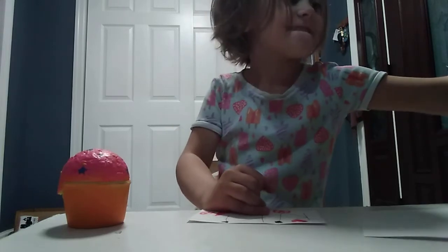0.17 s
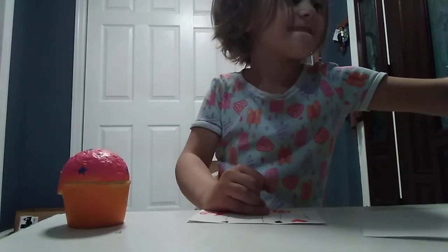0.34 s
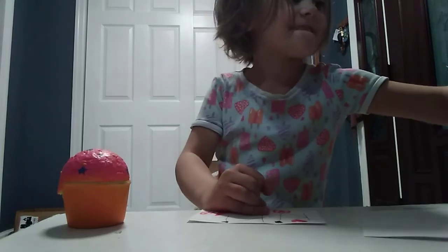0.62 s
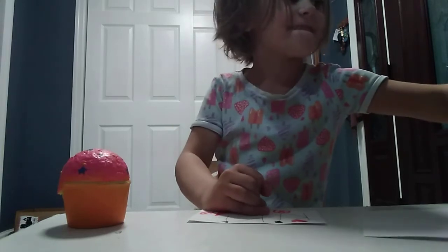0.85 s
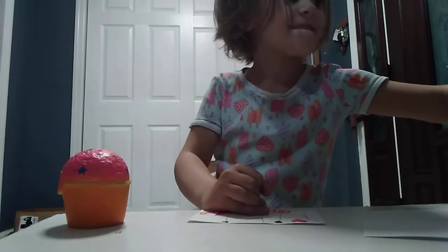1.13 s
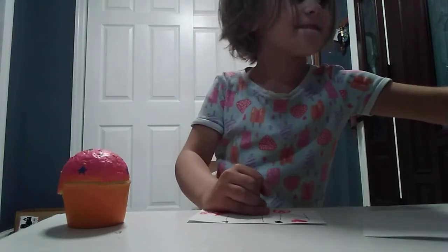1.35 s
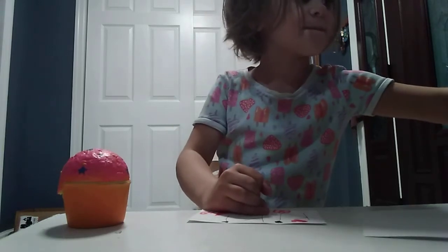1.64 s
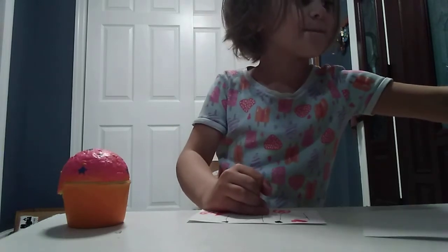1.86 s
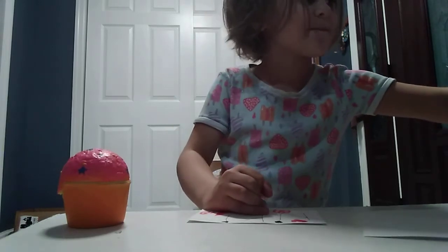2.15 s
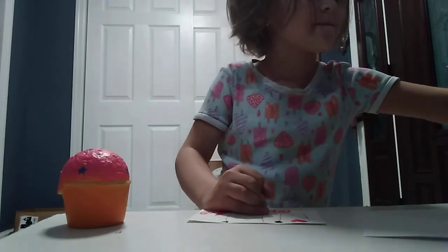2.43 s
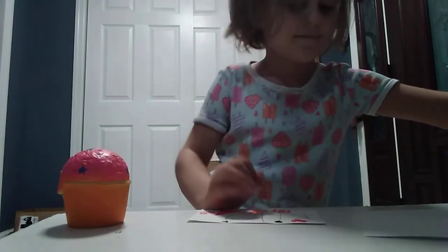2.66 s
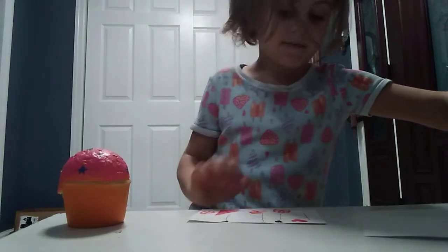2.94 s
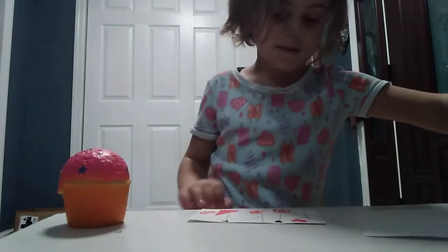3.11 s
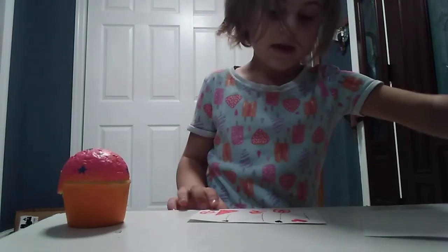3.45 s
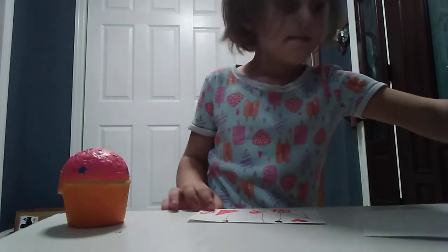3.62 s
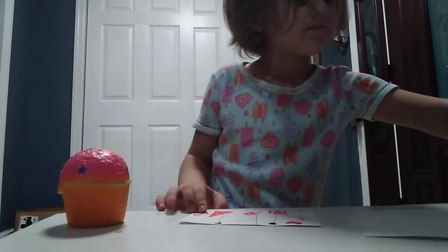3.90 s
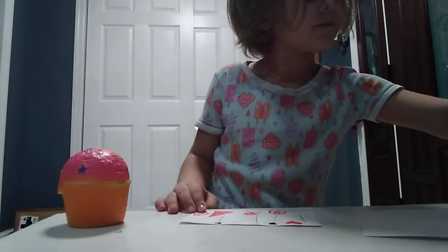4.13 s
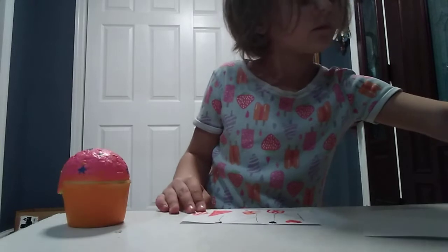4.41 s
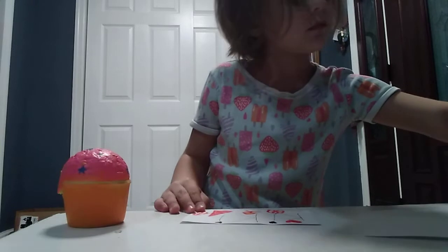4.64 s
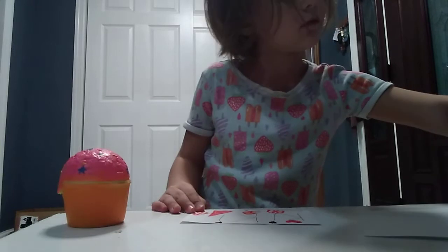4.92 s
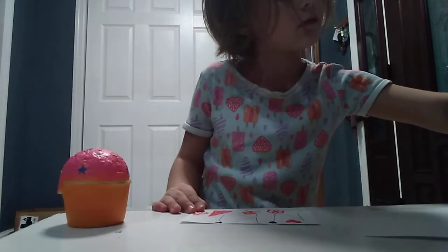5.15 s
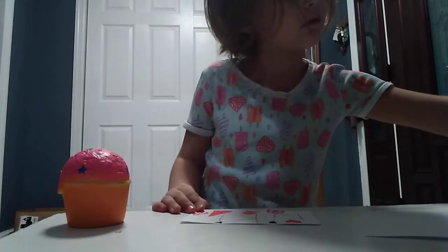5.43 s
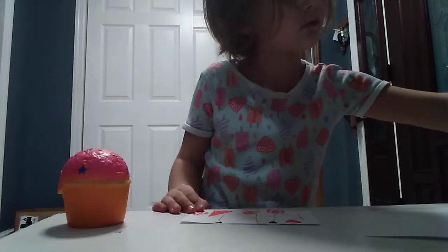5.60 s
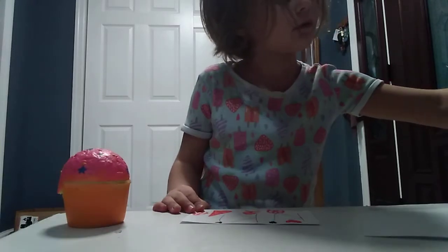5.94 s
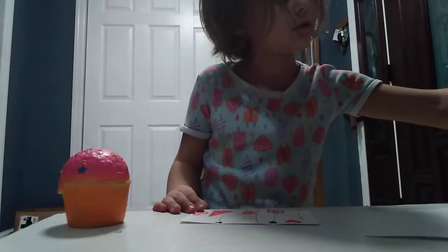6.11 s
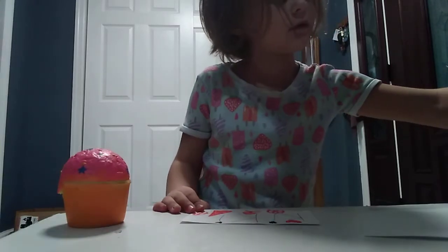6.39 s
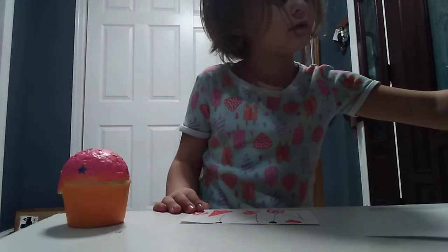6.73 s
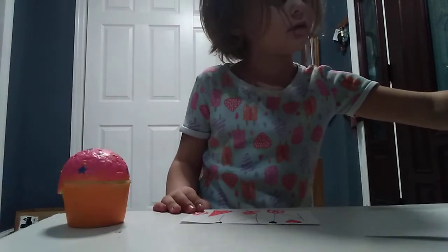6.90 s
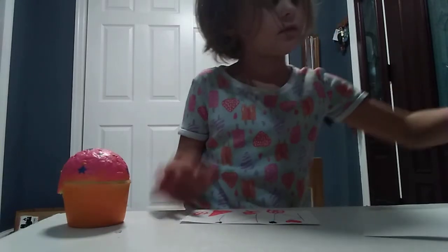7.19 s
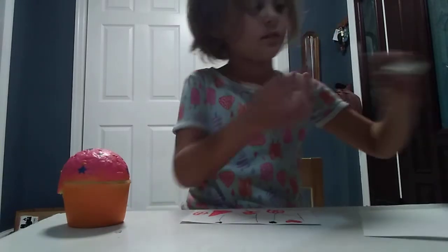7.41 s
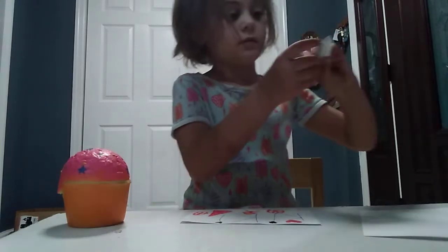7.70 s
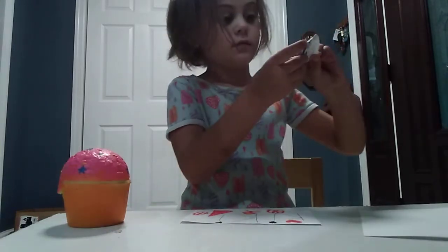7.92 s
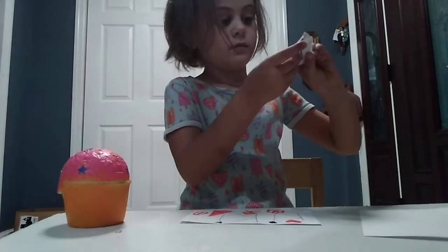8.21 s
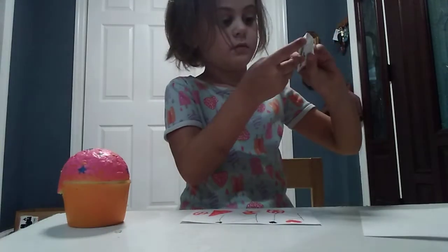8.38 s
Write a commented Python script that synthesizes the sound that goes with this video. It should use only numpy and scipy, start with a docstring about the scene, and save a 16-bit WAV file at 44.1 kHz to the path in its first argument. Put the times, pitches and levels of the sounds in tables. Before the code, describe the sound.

Close, dry stereo sound of a hand handling paper cards on a table in a small room, brighter on the left. From 0 to 0.5 s card edges tick and slide, with a sharp snap near 0.2; softer rubbing follows. From 1 to 2.2 s snaps come densely, strongest around 1.9 to 2.0. Then it thins: faint rustles and light flicks until 3.4, a tiny high squeak at 3.45, small knocks at 3.7 and a duller push at 3.9. A crisp click stands out at 4.5. Short scrapes continue, with a palm wipe at 5.7. A flurry of snaps at 6.2 to 6.4 leads into a loud, hollow, booming double knock at 6.44, then wiping. Near quiet around 7 s, with soft, dull ticks. Knocks and low bumps cluster at 7.5 to 7.65, then sparse faint sounds, ending with a thump and snap at 8.45.

```python
"""Card edges snap and tick, paper slides and rustles, and now and then a table top is knocked and booms.
A hand rummages through paper cards on a table, close to the left port of a small stereo recorder indoors.
Snaps are short noise bursts and slides are grainy friction noise, both shaped by resonances of the cards;
knocks and strokes drive the modes of the table. The ports hear the bass in roughly opposite phase,
and the right one is shaded from the treble."""
import sys
import numpy as np
from scipy import signal
from scipy.fft import rfft, irfft, next_fast_len
from scipy.io import wavfile
from scipy.ndimage import uniform_filter1d, map_coordinates

SR = 44100
rng = np.random.default_rng(int(sys.argv[2]) if len(sys.argv) > 2 else 0)


def output_pcm(signal):
    """Save a mono or channel-first signal as 16-bit PCM at the path in sys.argv[1].

    Samples are clipped to [-1, 1] before scaling.
    """
    pcm = np.clip(np.atleast_2d(signal).T, -1, 1) * 32767
    wavfile.write(sys.argv[1], SR, np.round(pcm).astype(np.int16))


N = 377055


def amp(db):
    """Decibel law: the amplitude ratio of a level in dB."""
    return 10 ** (np.asarray(db) / 20)


def unit(x):
    """Power normalisation: x brought to rms 1."""
    return x / np.sqrt(np.mean(np.abs(x) ** 2) + 1e-20)


def curves(rows):
    """Linear interpolation: one value per sample for each column after the time."""
    seconds, *columns = np.transpose(rows)
    return [np.interp(np.arange(N) / SR, seconds, column) for column in columns]


def wobble(rate):
    """Band-limited fluctuation: a smooth random curve with rate knots a second."""
    knots = rng.standard_normal(int(N * rate / SR) + 4)
    return map_coordinates(knots, [np.arange(N) * rate / SR])


def along(hz, values, f):
    """Logarithmic frequency scale: values given at hz, read at f."""
    return np.interp(np.log(f + 1), np.log(hz), values)


def filtered(x, response):
    """Linear filtering: the spectrum of x times a complex response of frequency."""
    m = next_fast_len(N + SR // 2)
    return irfft(rfft(x, m) * response(np.fft.rfftfreq(m, 1 / SR)), m)[..., :N]


def ringing(x, modes, order):
    """Modal superposition: resonances of alternating sign that keep the power of white noise."""
    def response(f):
        total = 0
        for k, (centre, width, db) in enumerate(modes):
            resonator = 1j * f * width / (centre * centre - f * f + 1j * f * width)
            total = total + (-1) ** k * amp(db) * resonator ** order
        return unit(total)
    return filtered(x, response)


def spikes(times, db):
    """Impulsive excitation: single samples of the given levels at the given times."""
    return np.bincount(np.round(np.asarray(times) * SR).astype(int), amp(db), N)[:N]


def dying(pulses, t60, rise):
    """Reverberant decay: two unrelated noises whose power swells after every pulse and dies away."""
    t = np.arange(SR // 2) / SR
    decay = amp(-120 * t / t60) * (1 - np.exp(-t / rise)) ** 2  # in power, 60 dB down at t60
    power = signal.fftconvolve(pulses ** 2, decay)[:N]
    return np.sqrt(np.abs(power)) * rng.standard_normal((2, N))


def friction(db, grain_db, lump_db):
    """Dry friction: fibres catch in tiny grains that clump under an uneven stroke."""
    texture = amp(grain_db * wobble(700) + lump_db * wobble(45))
    # about 70 times a second a fibre lets go with a tick
    catches = (rng.random(N) < 70 / SR) * rng.exponential(1, N)
    tick = np.exp(-np.arange(SR // 200) / 35)
    texture = texture * (1 + 0.84 * np.convolve(catches, tick)[:N])
    return amp(db) * unit(texture * rng.standard_normal((2, N)))


def patchy(x, depth_db, bins, frames):
    """Spectral fluctuation: a random gain field shifts the colour from moment to moment."""
    z = signal.stft(x, nperseg=256)[2]
    field = rng.standard_normal(z.shape[1:])
    field = uniform_filter1d(uniform_filter1d(field, bins, 0), frames, 1)
    gain = amp(depth_db * unit(field))
    return signal.istft(z * unit(gain), nperseg=256)[1][:, :N]


RISE_DB_PER_S, FALL_DB_PER_S = 162, 131.5  # how a movement swells and fades


def movement_db(starts, holds, db):
    """Energy addition: level in dB of overlapping movements that swell, hold and fade."""
    t = np.arange(0, N + 64, 64) / SR  # one value every 64 samples
    early, late = starts[:, None] - t, t - (starts + holds)[:, None]
    shape_db = -RISE_DB_PER_S * np.maximum(early, 0) - FALL_DB_PER_S * np.maximum(late, 0)
    power = np.sum(amp(db[:, None] + shape_db) ** 2, axis=0)
    return np.interp(np.arange(N) / SR, t, 10 * np.log10(power + 1e-12))


# Strokes of the hand through the cards. Each row: start in seconds, time held in seconds, relative level in dB,
# then in dB over that level: edge hiss, drag of the heap, groan of the top, rumble of the frame.
STROKES = [(0, 0.057, -45.5, 1, -2, -7, -15), (.24, 0.075, -53, 1, 0, -3.5, -25),
           (.55, 0.49, -60.5, -1, 1.5, -11, -23.5), (1.169, 0.066, -46.5, -5, -1, -10, -14),
           (1.3, 0.069, -50.5, 1, -1.5, -13.5, -13), (1.64, 0.04, -62, 10, -3, 1.5, -10),
           (1.78, 0.076, -49, 1.5, -3.5, -6.5, -30), (1.99, 0.22, -53.5, -1.5, -1.5, -2, -10.5),
           (2.26, .04, -61.5, -7, -4, -10, -13.5), (2.58, 0.14, -67.5, 5.5, 0.5, 4, -7),
           (2.798, 0.13, -50.5, -3, -4.5, -5.5, -12), (2.93, 0.21, -54.5, 3.5, -2.5, -4, -19),
           (3.33, 0.064, -56, -3, -4.5, -18, -26), (3.55, 0.23, -52, 5, -1.5, -5, -41),
           (3.838, 0.082, -50.5, 2.5, -6, -6, -7.5), (3.998, 0.05, -48, 2.5, -0.5, -0.5, -28),
           (4.13, 0.19, -56, 4, -1.5, 2, -32), (4.5, .03, -53.5, 7, -3.5, -12, -17.5),
           (4.742, 0.15, -58, 0.5, 2, -10, -28), (4.88, 0.11, -52.5, 0.5, -3, -1, -18),
           (5.07, 0.041, -65, 9, -9, -2, 6), (5.22, 0.1, -55.5, 3.5, -3.5, -17.5, -21),
           (5.392, 0.098, -49, -2, 0, -26, -38), (5.562, 0.024, -59, 8.5, 2, 1, 1),
           (5.69, 0.097, -48, 1, 0.5, 4.5, -23), (5.92, 0.046, -59.5, 2, -1.5, -3, -20),
           (6.36, 0.23, -55, 3, 0.5, 6, 1), (6.72, .025, -59.5, 19, -2, 5, 9),
           (6.745, 0.036, -50.5, 1.5, -1, 2.5, -3), (6.9, 0.062, -71.5, -8, 6, 12, 5.5),
           (7.14, 0.031, -65.5, 1.5, -15, -11.5, -26), (7.291, 0.033, -76.5, 3, -2, 2, 8.5),
           (7.411, 0.092, -62.5, 4.5, 3, 13, 8), (7.579, 0.064, -49, 3.5, -3, -3, 2.5),
           (7.782, 0.049, -61, 11, -2, -3, 0.5), (7.929, 0.017, -61, 11.5, -28, -16, -28.5),
           (8.091, 0.065, -89.5, 3, 4, 0.5, 22.5), (8.182, 0.082, -75, 21, -10, 0.5, 6.5),
           (8.27, 0.02, -75.5, 24, -9, 17, -5), (8.46, 0.048, -53.5, 2.5, 2.5, 0, -32)]
HISS, DRAG, GROAN, RUMBLE = 3, 4, 5, 6  # columns of the table


def stroke_db(layer=None):
    """Common excitation: one set of strokes sets the level of every layer, each with its own offset."""
    columns = np.transpose(STROKES)
    starts, holds, db = columns[:3]
    return movement_db(starts, holds, db if layer is None else db + columns[layer])


# Resonances of table legs and frame. Each row: centre in Hz, width of one resonator stage in Hz, relative level in dB.
FRAME = [(79, 104, 3), (155.5, 34, -4), (216, 293, -4.5)]


def frame_rumble():
    """Structure-borne sound: the strokes shake the legs and frame at their low resonances."""
    shaking = friction(stroke_db(RUMBLE) + 18, grain_db=3.0, lump_db=3.0)
    return ringing(shaking, FRAME, order=2)


# Knocks on the table top. Each row: time in seconds, relative level in dB, boom in dB over that level,
# pitch of the blow in Hz, contact (rise) time in seconds, t60 in seconds.
KNOCKS = [(2.489, -49.5, -42, 760, 0.004, 0.45), (3.453, -43.5, -46, 715, 0.0026, 0.31),
          (3.678, -33.5, -14, 940, 0.0025, 0.14), (3.94, -23, -42, 475, 0.013, 0.17),
          (4.277, -48.5, 2, 890, 0.0024, 0.14), (4.889, -39, -6, 155, 0.0048, 0.72),
          (5.551, -36, -30, 590, 0.004, 0.64), (6.049, -46, -44, 255, 0.0043, 0.42),
          (6.437, -17, -1, 441, 0.0022, 0.29), (6.459, -16.5, -17, 405, 0.003, 0.37),
          (7.27, -46.5, -24, 389, 0.0029, 0.72), (7.531, -19.5, -32, 638, 0.0029, 0.37),
          (7.595, -27, 4, 433, 0.0086, 0.19), (7.648, -31, 3, 399, 0.0062, 0.33),
          (8.079, -51, -16, 304, 0.0052, 0.53), (8.258, -45.5, -30, 517, 0.006, 0.51),
          (8.4, -44.5, -32, 454, 0.005, 0.23), (8.454, -23, -14.5, 220, 0.0076, 0.38)]
# Resonances of the table top. Each row: centre in Hz, width in Hz, relative level in dB.
TOP = [(142, 38, -7.5), (230.3, 31, -2), (309, 92, -3.5), (416, 60, -0.5), (573, 37, -3), (733, 80, -6.5),
       (1080, 390, -8), (1237, 437, -9), (2370, 930, -18.5), (9800, 8400, -31)]
# The lowest table mode: frequency in Hz, swell time in seconds.
BOOM = (76, 0.024)


def table_top():
    """Forced vibration: a blow, a rough push and a dragged arm drive the modes; the lowest swings freely."""
    push, boom = np.zeros((2, N + SR)), np.zeros((2, N + SR))
    t = np.arange(SR // 2) / SR
    boom_hz, swell = BOOM
    swing = np.sin(2 * np.pi * boom_hz * t) * t / swell * np.exp(1 - t / swell)
    for s, db, boom_db, hz, contact, t60 in KNOCKS:
        start = round(s * SR)
        force = (1 - np.exp(-t / contact)) * amp(-60 * t / t60) * rng.standard_normal((2, len(t)))
        u = t * hz * 6
        blow = 1.8 * u * np.exp(1 - u) * .003 / contact  # a shorter contact hits harder
        # the spot struck favours the modes near its pitch
        favoured = signal.lfilter(*signal.iirpeak(hz, 1.3, SR), force + blow)
        push[:, start:][:, :len(t)] += amp(db + 4) * (favoured + 0.4 * force)
        boom[0, start:][:len(t)] += amp(db + boom_db + 6) * swing
    groan = friction(stroke_db(GROAN) + 7.0, grain_db=-1.9, lump_db=0.6)  # an arm dragged over the top
    return ringing(push[:, :N] + groan, TOP, order=1) + boom[:, :N]


# A card squeaks as it slips. Each row: time in seconds, pitch in Hz, relative level in dB.
SQUEAK = [(3.426, 7120, -80), (3.432, 7280, -49), (3.446, 6960, -42), (3.455, 7260, -53), (3.47, 7430, -46),
          (3.484, 7080, -53), (3.498, 6600, -46), (3.503, 6500, -85)]


def squeak():
    """Stick-slip oscillation: a thin whistle that wavers in pitch and level."""
    hz, db = curves(SQUEAK)
    phase = 2 * np.pi * np.cumsum(hz + 60 * wobble(300)) / SR
    return amp(db - 2.5 + 3.5 * wobble(150)) * np.sin(phase)


# The palm wiping the bare table. Each row: start in seconds, time held in seconds, relative level in dB.
WIPES = [(1.33, 0.04, -46.5), (2.07, .04, -51), (5.7, 0.071, -40.5), (6.521, 0.058, -48.5),
         (6.77, 0.016, -42.5), (7.58, 0.029, -42), (7.82, 0.03, -57.5)]
# Resonances of skin rubbing the table top. Each row: centre in Hz, width of one stage in Hz, relative level in dB.
PALM = [(1350, 1700, 0), (2050, 3560, -2)]
FINGERS_DB = -7  # brush of skin in every stroke, over its level


def palm():
    """Sliding friction: skin brushes in every stroke and wipes the table; the louder of the two is heard."""
    palm_db = np.maximum(stroke_db() + FINGERS_DB, movement_db(*np.transpose(WIPES)))
    return ringing(friction(palm_db + 2, grain_db=-0.5, lump_db=-1.0), PALM, order=2)


# Resonances of the cards. Each row: centre in Hz, width of one stage in Hz, relative level in dB.
EDGE = [(7190, 4700, -8.5), (10730, 3130, 3), (13200, 5700, -12)]  # thin edges and the microphone port
SHEET = [(1980, 1630, -5.5), (3230, 1290, 2.5), (4083, 750, -0.5), (5650, 2850, -3)]  # the flexing card
PILE = [(451, 387, -2), (633, 254, 1.7), (950, 433, 0.87)]  # the heap of cards on the table


def rubbing():
    """Friction-excited resonance: sliding hisses at the edges, scrapes the sheets and drags the heap."""
    rub = palm()
    rub += ringing(friction(stroke_db(HISS) + 4, grain_db=0.0, lump_db=2.5), EDGE, order=2)
    rub += ringing(friction(stroke_db() + 4.0, grain_db=-0.5, lump_db=3.0), SHEET, order=2)
    rub += ringing(friction(stroke_db(DRAG) + 8.0, grain_db=0.5, lump_db=3.0), PILE, order=2)
    return patchy(rub, depth_db=3, bins=2, frames=24)


# Card edges snapping. Each row: time in seconds, relative tick level in dB, flap in dB over the tick,
# tap in dB over the tick, length in seconds.
SNAPS = [(0.028, -40, -7, -10, 0.0004), (0.059, -35, 1, -7, 0.00034), (0.0715, -29, 4, -6, 0.00055),
         (0.0825, -26, -4.5, -3.5, 0.0008), (0.165, -39.5, -4.5, -1.5, 0.0013),
         (0.1862, -14.5, -11, -25, 0.0007), (0.203, -24, -9.5, -16, 0.0013),
         (0.2256, -28, -12.5, -13, 0.00066), (0.2436, -36, -3, -4, 0.001), (0.3117, -29, -8.0, -5, 0.00056),
         (0.3126, -41, 8.5, 5, 0.00047), (0.4323, -49.5, 8, 9.5, 0.0006), (0.4595, -42.5, -8, -3, 0.0015),
         (0.476, -34, -4.0, -7.5, 0.0006), (0.487, -47.5, 6.5, 8, 0.0011),
         (0.5716, -40.5, -5.5, -3, 0.0003), (0.6047, -26.5, -14, -13, 0.00053),
         (0.8044, -41.5, 8.5, 4, 0.00046), (0.9018, -42.5, -1.5, 6, 0.0014),
         (0.9644, -42.5, 7.5, 4.5, 0.00035), (1.0153, -32.5, 4.5, 5, 0.001),
         (1.0752, -24.0, -3, -14, 0.001), (1.1355, -31.5, 6.5, 0, 0.00062), (1.1556, -27.5, 6, -5, 0.0011),
         (1.186, -18.5, -10, -15, 0.00027), (1.2044, -27.5, -0.5, -7, 0.0028),
         (1.2285, -17, -8, -18.0, 0.0006), (1.262, -37, 0.5, -4, 0.0038),
         (1.3038, -17.0, -6.5, -19, 0.0007), (1.365, -35.5, 5.5, -5, 0.00063),
         (1.5164, -36.5, 3, -4.5, 0.0004), (1.5573, -20.0, -2.5, -18, 0.00056),
         (1.5777, -24.0, -6.0, -14, 0.0025), (1.622, -40, 5, -5.5, 0.00069), (1.6584, -24, -2, -12, 0.0006),
         (1.6723, -30.5, -3, -7.5, 0.0017), (1.735, -27.5, -4, -9, 0.0008), (1.748, -29, 2.5, -9.5, 0.0018),
         (1.7688, -32, 3.5, -6, 0.0019), (1.814, -19, -13.5, -22, 0.0004),
         (1.8247, -21.0, -4.0, -11.5, 0.0006), (1.911, -14, -14.5, -23, 0.0003),
         (1.964, -14, -15.5, -17.5, 0.0003), (1.9822, -7.5, -17.5, -29, 0.0003),
         (1.999, -15, -9, -21.5, 0.00056), (2.036, -26.5, -3, -12.5, 0.0023),
         (2.081, -35.5, -8.5, -6, 0.0031), (2.2035, -20.5, -11.5, -19.5, 0.00057),
         (2.3036, -40, -9.5, -14.0, 0.00035), (2.511, -53, -3.0, 7, 0.00024), (2.53, -54.0, -6, 1, 0.00039),
         (2.6292, -25.5, -8.0, -11.0, 0.00084), (2.7162, -33.0, 0, -8, 0.00044),
         (2.7515, -26.0, -1.5, -7.5, 0.00068), (2.8754, -35.5, 5, 4.5, 0.0019), (2.9, -25.0, 4, -3, 0.001),
         (2.9737, -33, 1, -0.5, 0.00063), (3.1199, -40, -0.5, 0, 0.0024), (3.299, -49, -1.0, -2, 0.00077),
         (3.3574, -36, -9, -7, 0.00078), (3.5235, -54, 8, 0.0, 0.0026), (3.587, -43.5, -7.5, -8.0, 0.0006),
         (3.638, -33.5, -7, -6, 0.00097), (3.695, -33.0, 1.5, -10, 0.00055), (4.0325, -41, -3, -4, 0.0012),
         (4.097, -34.5, -11.0, -11.0, 0.0009), (4.177, -41.5, -0.5, 2, 0.0015),
         (4.2013, -36.5, 1.5, -4, 0.0005), (4.28, -36, 7.5, 0.5, 0.00068),
         (4.399, -47.0, 5.0, -6.0, 0.0004), (4.4215, -44.5, 0, 0, 0.0013),
         (4.4733, -12.5, -17.5, -25, 0.00021), (4.4768, -28.5, -16.5, -23, 0.0017),
         (4.769, -41, -3.5, -2.5, 0.0014), (4.7874, -28.5, -11.5, -12, 0.0008),
         (4.8993, -26, -8, -13, 0.0009), (4.926, -43, -6.0, -8.0, 0.0014),
         (4.9477, -34.5, -3.5, -4.5, 0.0009), (4.9539, -36, 0, -0.5, 0.0005),
         (5.082, -45.5, -12.0, -4, 0.0032), (5.22, -43, 5.5, 2.5, 0.0024),
         (5.358, -31.5, -14.0, -19.5, 0.00037), (5.375, -39, -7.0, -5, 0.0022),
         (6.2235, -39, -8.5, -6.5, 0.00077), (6.2425, -32.5, -9, -10.5, 0.0011),
         (6.2565, -28.5, -3.0, -7.0, 0.0025), (6.2778, -21.0, -5, -10, 0.0016),
         (6.2892, -16.5, -12.5, -11, 0.00034), (6.31, -23.0, -4.5, -8.5, 0.0027),
         (6.342, -28.0, -3.5, -7, 0.00058), (6.3665, -24, -4, -7.0, 0.00098),
         (6.436, -26.5, -13, -2, 0.0003), (6.979, -50.5, -18, -6.5, 0.0006),
         (6.996, -48.5, -19.0, -7, 0.0013), (7.021, -42, -26, -12.5, 0.0014),
         (7.0486, -41.5, -25, -15, 0.0013), (7.0796, -44, -33, -15.0, 0.001),
         (7.1113, -37.5, -30.5, -30.0, 0.0045), (7.15, -32, -21.5, -32.5, 0.005),
         (7.178, -28, -20.5, -38.0, 0.0037), (7.3364, -46.5, -16.0, -3, 0.00043),
         (7.417, -46.5, 0.0, 3, 0.001), (7.429, -35, -6, -4, 0.0026), (7.792, -41.0, -14, -11.5, 0.0031),
         (8.177, -29.5, -29, -25.0, 0.00032), (8.2595, -35.0, -15, -26, 0.0012),
         (8.327, -40.5, -15.5, -11, 0.001), (8.4727, -18, -12, -11, 0.00048)]
LEAD_S, LEAD_DB = .0042, -14  # each snap follows a fainter, like burst about 4 ms earlier


def snapping(db, ring_db, ring_t60, room_db, room_t60):
    """Impulsive release: each crack swells fast and rings out, then the room answers."""
    crack, t = np.zeros((2, N + SR)), np.arange(SR // 16) / SR
    times, *_, lengths = np.transpose(SNAPS)
    lead = round(LEAD_S * SR)
    for s, level_db, length in zip(times, db, lengths):
        u = t / max(length, .0003)
        burst_shape = u * np.exp(.5 - u * u / 2)
        ring_shape = (1 - np.exp(-u)) * amp(ring_db - 60 * t / ring_t60)
        shape = burst_shape + ring_shape
        shape = np.pad(shape, (lead, 0))[:len(t)] + amp(LEAD_DB) * shape
        burst = shape * rng.standard_normal((2, len(t)))
        start = max(round((s - length - LEAD_S) * SR), 0)
        crack[:, start:start + len(t)] += amp(level_db) * unit(burst) * np.sqrt(np.mean(shape ** 2))
    # the far port hears less of the crack, as much of the room
    shaded = crack[:, :N] * amp([[0], [-5]])
    energy_db = db + 10 * np.log10(lengths / 0.0015)  # a longer snap excites the room more
    return shaded + amp(room_db) * dying(spikes(times, energy_db), room_t60, 0.0043)


def snaps():
    """Modal excitation by impulses: each snap ticks the edges, flaps the sheets and taps the heap."""
    _, tick_db, flap_over_db, tap_over_db, _ = np.transpose(SNAPS)
    tick = snapping(tick_db + 1.0, ring_db=-5.5, ring_t60=0.024, room_db=-12.5, room_t60=0.29)
    flap = snapping(tick_db + flap_over_db + 2.0, ring_db=-5, ring_t60=0.059, room_db=-10, room_t60=0.32)
    tap = snapping(tick_db + tap_over_db + .1, ring_db=-1, ring_t60=0.11, room_db=-9.5, room_t60=0.28)
    snap = ringing(tick, EDGE, order=2) + ringing(flap, SHEET, order=2) + ringing(tap, PILE, order=2)
    return patchy(snap, depth_db=2.5, bins=6, frames=5)


def ports(pair, rows):
    """Partial coherence: the right port hears a turned copy of the left sound plus sound of its own."""
    hz, db, alike, turn = np.transpose(rows)
    alike = np.clip(alike, 0, 1)

    def shared_response(f):
        return amp(along(hz, db, f)) * along(hz, alike, f) * np.exp(1j * along(hz, turn, f))

    def own_response(f):
        return amp(along(hz, db, f)) * np.sqrt(1 - along(hz, alike, f) ** 2)
    right = filtered(pair[0], shared_response) + filtered(pair[1], own_response)
    return np.array([pair[0], right])


# Right port against left. Each row: frequency in Hz, level in dB, likeness from 0 to 1, phase turn in radians.
PORTS = [(200, -16, 0.16, -3.5), (530, -7.5, 0.2, 2.2), (912, -10, 1, -2.2), (1520, -6, 0.86, -1),
         (3300, -10.5, 0, -5.5), (5000, -2.5, 0, -7), (6800, -10, 0, -11), (10600, -29, 0.3, -4.5),
         (14730, -27.5, .15, -1.5)]  # sound through the air
TABLE_PORTS = [(63, -2.5, 0.93, 2.71), (198, -8.5, 1, 2.44), (420, -6.5, 1, 3.96), (640, -6.5, 0.9, 4.54),
               (880, -13.5, 0.65, 1.35), (2500, -4, 0.34, 1.8), (5000, -0.5, 0.16, 6),
               (10500, -17, 0.36, 6.1)]  # sound through the table


def scene():
    """Superposition of two paths: cards heard through the air, knocks and rumble through the table."""
    through_table = frame_rumble() + table_top()
    through_air = squeak() + rubbing() + snaps()
    return ports(through_air, PORTS) + ports(through_table, TABLE_PORTS)


# Threshold of the noise suppressor. Each row: frequency in Hz, band level in dB.
QUIET = [(50, -88.5), (300, -62), (1500, -87), (5000, -77), (10500, -85), (14000, -90.5)]
LOW_HZ, TOP_HZ = 30.6, 15900  # bass limit of the ports, upper band limit


def record(dry):
    """Spectral suppression, soft limiting and band limiting: faint bands sink, loud peaks are rounded."""
    hz, _, z = signal.stft(dry, SR, nperseg=512, noverlap=384)
    # the left port sets the gain of both
    power = uniform_filter1d(uniform_filter1d(np.abs(z[0]) ** 2, size=3, axis=0), size=7, axis=1)
    quiet = amp(along(*np.transpose(QUIET), hz))[:, None] ** 2
    gain = np.maximum(power / (power + quiet), .05) ** 0.42
    clean = signal.istft(z * gain, SR, nperseg=512, noverlap=384)[1][:, :N]
    clean = clean / (1 + np.abs(clean / .85) ** 6) ** (1 / 6)
    return filtered(clean, lambda f: (f < TOP_HZ) * (1j * f / (LOW_HZ + 1j * f)) ** 2)


dry = scene()
out = record(dry)
output_pcm(out)
```